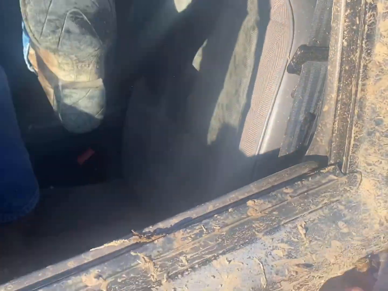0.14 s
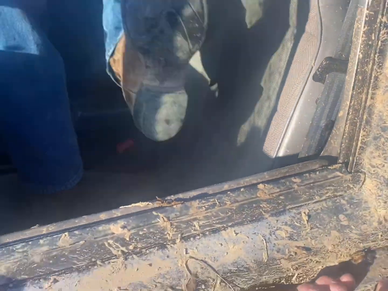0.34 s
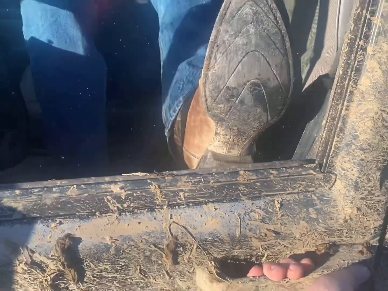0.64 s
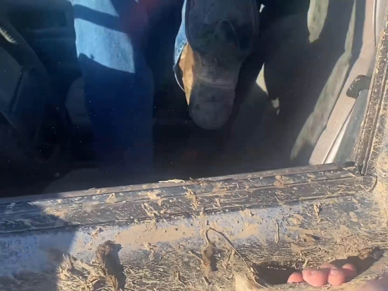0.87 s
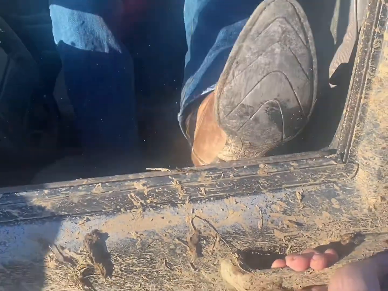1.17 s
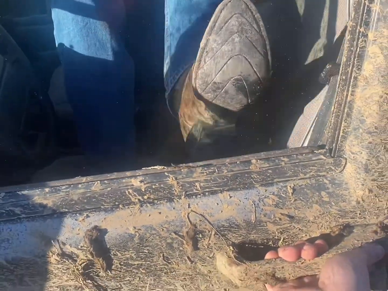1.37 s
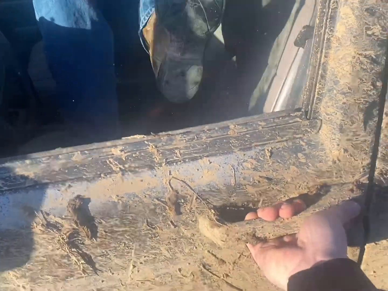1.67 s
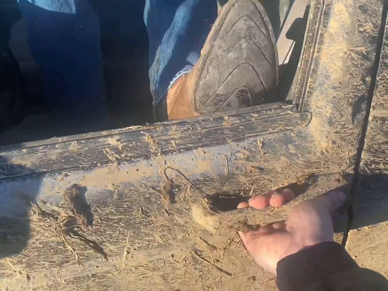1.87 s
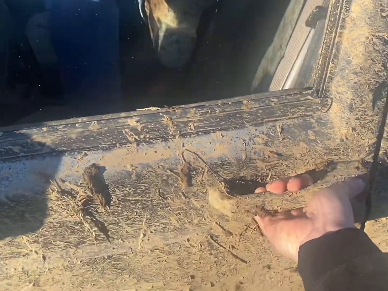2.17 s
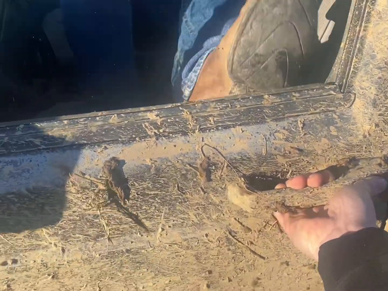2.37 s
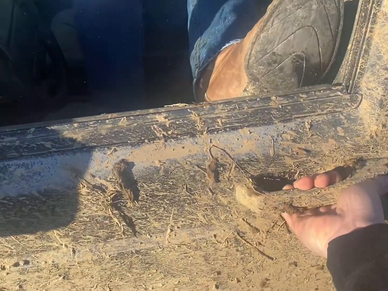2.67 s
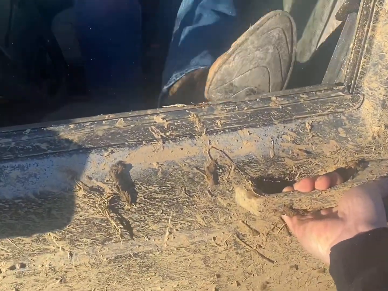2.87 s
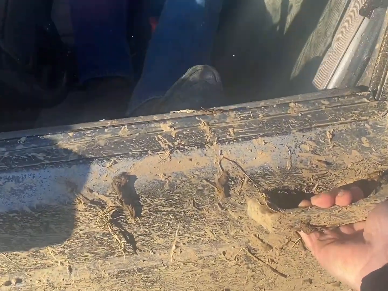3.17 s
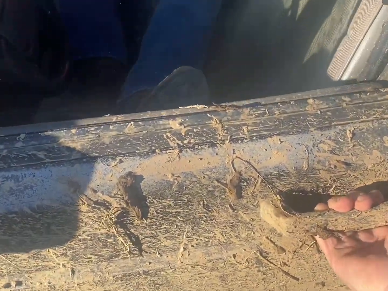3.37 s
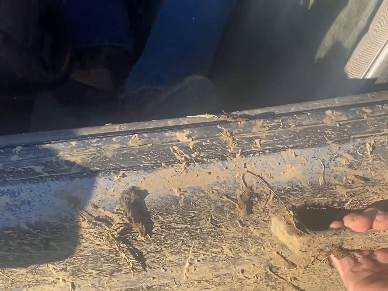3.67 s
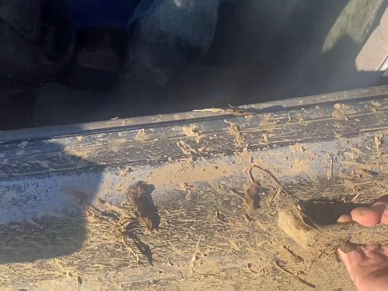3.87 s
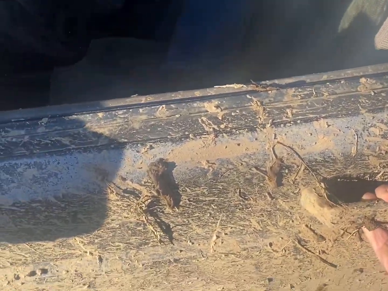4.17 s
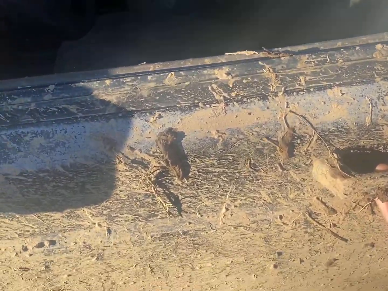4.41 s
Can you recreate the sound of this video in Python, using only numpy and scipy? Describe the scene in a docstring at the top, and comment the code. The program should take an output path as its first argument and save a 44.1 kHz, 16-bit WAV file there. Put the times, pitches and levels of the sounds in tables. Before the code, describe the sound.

Four booming boot kicks against a vehicle's door frame rattle loose trim while an engine hums softly, followed by light shuffling.

```python
"""At the door sill of an idling vehicle, a muddy boot kicks four times while the engine speed wanders.
Each impact cracks, disperses through the panel as a falling sweep and excites the modes of sill and
cab; the body booms, loose trim rattles and dried mud patters down. Cloth rustles by friction with
every swing, and the boot is set down with small knocks, scuffs and a dull thump.
A close microphone with a limiter compresses the kicks."""
import sys
import numpy as np
from scipy import signal
from scipy.io import wavfile
from scipy.ndimage import uniform_filter1d, minimum_filter1d

SR = 44100
rng = np.random.default_rng(int(sys.argv[2]) if len(sys.argv) > 2 else 0)


def output_pcm(signal):
    """Save a mono or channel-first signal as 16-bit PCM at the path in sys.argv[1].

    Samples are clipped to [-1, 1] before scaling.
    """
    pcm = np.clip(np.atleast_2d(signal).T, -1, 1) * 32767
    wavfile.write(sys.argv[1], SR, np.round(pcm).astype(np.int16))


N = 200346
T = np.arange(N) / SR

# Coherence of the two channels in broadband noise: f/Hz, correlation
COHERENCE = [(100, 0.9), (300, 0.81), (550, .6), (1000, 0.19), (2000, 0.58), (4500, 0.85), (8000, 1),
             (14000, 1)]
# Its balance: f/Hz, left minus right/dB
BALANCE = [(100, 0.5), (300, -2), (1000, 0.5), (2200, 3), (4000, 3), (8000, -0.5)]
# Course of the engine: t/s, fundamental f/Hz, second-order level/dB
ENGINE_COURSE = [(0, 64.7, -22.5), (0.091, 73.7, -40.5), (0.312, 80.56, -32), (.55, 85.55, -32.5),
                 (.98, 83.9, -34), (1.302, 77.43, -41.5), (2.249, 70.5, -50.5), (3.05, 61.38, -45),
                 (3.379, 55.73, -42), (3.851, 59.62, -36.5), (4.2, 62.9, -31), (4.54, 65.6, -34)]
# Upper engine orders: multiple, level at idle/dB
UPPER_ORDERS = [(3, -65), (4, -66.5), (5, -65.5), (6, -77)]
# Cloth rubbing as the leg shifts: t/s, level/dB, half-width/s
LEG_SHIFTS = [(0.02, -62, 0.094), (2.72, -65, .15), (2.956, -65, 0.089), (3.13, -74, 0.054),
              (3.358, -70, 0.023), (3.545, -57.5, .03), (3.708, -59, 0.12), (3.858, -58, 0.047),
              (4.2, -68, 0.12)]
# Cloth as the leg draws back, swings in and presses: t from kick/s, level/dB, half-width/s
LEG_SWING = [(-.22, -68, 0.27), (-.02, -53.5, 0.024), (0.208, -67, .11)]
# Kicks: t/s, force/dB, crack/dB, panel ring/dB, shudder/dB,
# struck spot f/Hz, spot/dB, sole slap/dB, rattle/dB, cloth/dB
BOOT_KICKS = [(0.3549, 1.5, -0.5, -1.5, -0.5, 545.4, -8, -23, 0, 5.5),
              (1.0245, -0.5, -4.5, 4, 0, 876, -12.5, -24, -3.5, -1),
              (1.682, -1, 8.5, 5.5, 5, 245, -5, -19, -3, -2),
              (2.294, -1, 0, 4.5, 0.5, 1252, -15.5, -30, -4, -8.5)]
# Modes of sill and cab: f/Hz, level/dB, T60/s
SILL_MODES = [(65, -10.5, 0.56), (74.6, -24.5, 0.17), (96.1, -3, 0.19), (110.8, -21.5, 0.75),
              (145.3, -16, 0.5), (170.8, -14, 0.56), (218.5, -23, 0.38), (269, -25, 0.17),
              (277, -24.5, 0.19), (292.3, -21.5, 0.43), (322.2, -11.5, 0.21), (335.7, -16, 0.35),
              (366.4, -22, 0.44), (376, -13.5, .27), (417, -15, 0.077), (522, -33.5, 0.15),
              (540, -24, 0.03), (615, -32.5, 0.48), (602, -33, 0.21), (683, -23.5, 0.28), (780, -26, 0.32),
              (825, -24.5, 0.37), (1134, -30.5, 0.058), (1334, -27.5, 0.28)]
# Push, rebound and rocking of the body: t after kick/s, f/Hz, level/dB, half-width/s
BODY_BOOMS = [(.0175, 100, -8.5, 0.014), (.059, 90, -11.5, 0.0057), (0.216, 54.3, -19, .036),
              (.315, 49, -25.5, .025), (0.417, 54, -25, .026)]
# Bounces of loose trim: t after kick/s, level/dB
TRIM_BOUNCES = [(.013, -12.5), (0.036, -13.5), (0.041, -12.5), (.055, -10), (.076, -12.5), (.101, -20),
                (.133, -37), (.188, -43.5), (0.305, -62)]
# Light knocks of the boot: t/s, level/dB, f/Hz, bandwidth/Hz
BOOT_KNOCKS = [(1.461, -33, 1300, 500), (1.469, -37.5, 481.6, 300), (2.675, -35, 695, 173),
               (2.678, -26.5, 190, 79.7), (2.742, -50, 1320, 1992), (2.804, -47, 1210, 1191),
               (3.492, -25.5, 171.5, 47.8), (3.556, -50.5, 1050, 400), (3.634, -45, 597, 495),
               (3.682, -39.5, 934, 802), (3.741, -44, 840, 1200), (4.102, -57, 700, 893)]
# Squeaks and swishes of the dragging sole: t/s, level/dB, f/Hz, bandwidth/Hz, half-width/s
SOLE_SCUFFS = [(2.948, -54.5, 3254, 351, .02), (2.952, -57.5, 1308, 900, 0.058),
               (3.118, -65, 12000, 6000, 0.028), (3.19, -49, 800, 450, .03),
               (3.265, -44.5, 1175, 172, .0075), (3.534, -63.5, 3940, 598, .023),
               (3.866, -55.5, 691, 693, 0.03), (4.061, -70.5, 3370, 502.4, 0.09)]
# Thump of the settling boot: t/s, level/dB
HEEL_THUMP = (3.6438, -12)
# Reflections from door and footwell: delay/s, level/dB
REFLECTIONS = [(.0019, -23.5), (.0043, -14)]
# Resonances of the left microphone port: f/Hz, bandwidth/Hz
PORT_MODES = [(8950, 1900), (13450, 310)]

# Noise spectra: f/Hz, relative density level/dB
RUMBLE_SPECTRUM = [(25, -15.5), (55, 5), (110, 3.5), (200, -4), (330, -15.5), (500, -23.5), (1000, -33),
                   (2000, -38), (4000, -46), (7000, -53), (11000, -61), (16000, -63.5)]  # engine and outdoor air
CLOTH_SPECTRUM = [(400, 7), (900, 7.5), (1500, 1), (2300, 1), (3800, -2.5), (7000, -10), (11000, -16),
                  (16000, -25)]  # cloth and leather
SNAP_SPECTRUM = [(1000, -6.5), (3000, -3.5), (5500, -5.5), (8000, 3.5), (11500, -5.5), (16000, -12.5)]  # hard contact
CRACK_SPECTRUM = [(300, -11.5), (700, -4), (1400, -14.5), (2000, -2.5), (4000, 6), (7500, -7.5),
                  (11000, -13), (16000, -85)]  # the struck sill
SHUDDER_SPECTRUM = [(25, -1.5), (50, -2.5), (200, -7.5), (360, 8.5), (450, -29.5), (560, 0.5), (780, -2),
                    (1050, -12.5), (1800, -13.5), (3800, -17.5), (7000, -30), (11000, -36.5),
                    (16000, -38.5)]  # the shaken body
CAB_SPECTRUM = [(25, 8.5), (55, 4), (150, 5), (350, -7), (500, -11.5), (800, -16.5), (1500, -27.5),
                (4000, -46.5), (7500, -55.5), (16000, -66.5)]  # reverberation of the cab
TRIM_SPECTRUM = [(200, 27), (700, 12), (1500, -22), (3700, 8.5), (5500, -21), (8000, -1.5), (12000, -22),
                 (16000, -35.5)]  # clacking trim
MUD_SPECTRUM = [(500, 7), (1500, 4.5), (4000, 1), (7000, -7), (11000, -20), (16000, -23)]  # falling crumbs


def from_db(db):
    """Amplitude ratio of a level in decibels."""
    return 10 ** (np.asarray(db) / 20)


def rms_one(x):
    """Normalisation to unit mean power."""
    return x / np.sqrt(np.mean(x ** 2) + 1e-20)


def at_hz(points, hz):
    """Interpolation on a logarithmic frequency axis."""
    frequencies, values = np.transpose(points)
    return np.interp(np.log(hz), np.log(frequencies), values)


def age(s):
    """Time elapsed since s, zero before."""
    return np.maximum(T - s, 0)


def decay(s, t60):
    """Damping: a step to one at s, then a fall of 60 dB every t60 seconds."""
    return (T >= s) * np.exp(-np.minimum(np.log(1000) * age(s) / t60, 40))


def swell(s, half_width):
    """A Gaussian envelope, down to 1/e at half_width seconds from s."""
    return np.exp(-np.minimum(((T - s) / half_width) ** 2, 40))


def drift(rate_hz):
    """Random modulation of unit rms, interpolated between independent values."""
    knots = rng.standard_normal(4096)
    return rms_one(np.interp(T * rate_hz, np.arange(len(knots)), knots))


def grains(per_s, spread_db, decay_s):
    """Shot noise: an envelope of randomly timed ticks, most small and a few large."""
    arrivals = rng.random(N) < per_s / SR
    sizes = from_db(spread_db * np.minimum(rng.exponential(1, N), 3))
    return signal.lfilter([1], [1, -np.exp(-1 / (decay_s * SR))], arrivals * sizes + 1e-18)


def resonance(x, hz, width):
    """A two-pole resonator of unit peak gain and a bandwidth of width Hz."""
    radius = np.exp(-np.pi * width / SR)
    feedback = [1, -2 * radius * np.cos(2 * np.pi * hz / SR), radius ** 2]
    return signal.lfilter(np.array([1, 0, -1]) * (1 - radius ** 2) / 2, feedback, x)


def coloured_noise(spectrum):
    """Partially coherent stereo noise of unit rms, summed from half-octave bands."""
    out, edges = 0, 24 * 2 ** np.arange(0, 9.6, .5)
    white, sides = rng.standard_normal((2, 2, N)), np.array([[1], [-1]])
    for k, (low, high) in enumerate(zip(edges, edges[1:])):
        band = signal.butter(2, [low, high], "band", fs=SR, output="sos")
        mid, side = signal.sosfilt(band, white[k % 2])
        hz = np.sqrt(low * high)
        alike = np.clip(at_hz(COHERENCE, hz), -1, 1)
        gain = from_db(at_hz(spectrum, hz) + sides * at_hz(BALANCE, hz) / 2)
        out = out + gain * (np.sqrt(1 + alike) * mid + np.sqrt(1 - alike) * side * sides)
    return rms_one(out)


def narrow_noise(hz, width, spread=0.48, wide_hz=700):
    """Resonant stereo noise of unit rms, more coherent in the bass."""
    mid, side = resonance(resonance(rng.standard_normal((2, N)), hz, width), hz, width)
    return rms_one(mid + spread * min(hz / wide_hz, 1) * side * np.array([[1], [-1]]))


def engine(idle_hz=60, waver_db=3.5, rough_db=4.0):
    """Periodic excitation: a second-order hum; the other orders and the rumble grow with speed."""
    times, *columns = np.transpose(ENGINE_COURSE)
    hz, hum_db = [np.interp(T, times, column) for column in columns]
    phase = 2 * np.pi * np.cumsum(hz) / SR
    above_idle = hz - idle_hz
    first_order_db = -51 + 0.672 * above_idle + waver_db * drift(rate_hz=20)
    hum = from_db(first_order_db) * np.sin(phase) + from_db(hum_db) * np.sin(2 * phase)
    for order, db in UPPER_ORDERS:
        order_db = db + 0.35 * above_idle + rough_db * drift(rate_hz=9.9)
        hum += from_db(order_db) * np.sin(order * phase)
    rumble = from_db(-43.5 + 0.36 * above_idle) * coloured_noise(RUMBLE_SPECTRUM)
    return np.sqrt(2) * hum + rumble


def cloth_rustle(rest_db=-70, grain_db=2.0, patchy_db=4.0):
    """Stick-slip friction: cloth and leather catch in patches, and the mud on them crackles."""
    motion = from_db(rest_db) + sum(from_db(db) * swell(s, half) for s, db, half in LEG_SHIFTS)
    for s, *_, cloth_db in BOOT_KICKS:
        motion += sum(from_db(cloth_db + db) * swell(s + after, half) for after, db, half in LEG_SWING)
    slipping = from_db(grain_db * drift(rate_hz=200) + patchy_db * drift(rate_hz=50))
    crackle = from_db(-3) * grains(per_s=40, spread_db=3.5, decay_s=0.001)
    return motion * (slipping + crackle) * coloured_noise(CLOTH_SPECTRUM)


def bending_wave(s, drop_hz, end_hz, fall_s, t60):
    """Dispersion: short bending waves travel fastest, so a blow arrives as a falling sweep."""
    t = age(s)
    cycles = end_hz * t + drop_hz * fall_s * np.log1p(t / fall_s)
    return np.sin(2 * np.pi * cycles) * decay(s, t60)


def sill_ring(s, ring_db, vary_db=2.0, panel_hz=200, scatter_hz=1100):
    """Modal superposition: each damped mode builds up over a cycle or two, so the lows come last."""
    t, out = T[:SR], np.zeros((2, N))
    start = round(s * SR)
    chances = rng.standard_normal((len(SILL_MODES), 3))
    for (hz, db, t60), (strength, timing, skew) in zip(SILL_MODES, chances):
        if hz > panel_hz:  # panel modes vary from kick to kick, the deep cab modes do not
            db += ring_db + vary_db * strength
        envelope = from_db(db - 60 * t / t60) * (1 - np.exp(-(t * hz) ** 2))
        # the phase of short waves depends on where the boot lands
        scatter = (hz / scatter_hz) ** 2 * (timing + skew * np.array([[.2], [-.2]]))
        out[:, start:start + SR] -= envelope * np.sin(2 * np.pi * (hz * t + scatter))
    return out


def body_booms(s):
    """Recoil: the body yields, rebounds and rocks, radiating low-frequency pulses."""
    return sum(from_db(db) * swell(s + after, half) * np.cos(2 * np.pi * hz * (T - s - after))
               for after, hz, db, half in BODY_BOOMS)


def kicks():
    """Impulsive excitation: brief contact gives broadband noise and sets panel and cab vibrating."""
    vibration = slap = snap = crack = shudder = tail = 0
    for s, force_db, crack_db, ring_db, shudder_db, spot_hz, spot_db, slap_db, *_ in BOOT_KICKS:
        force = from_db(force_db)
        wave = bending_wave(s, drop_hz=2450, end_hz=80, fall_s=.0007, t60=.2)
        sweep = from_db(-2) * wave * swell(s + .005, half_width=.006)
        spot_envelope = from_db(spot_db) * decay(s, t60=.1) * (1 - decay(s, t60=0.0091))
        spot = spot_envelope * narrow_noise(spot_hz, width=140)
        vibration += force * (sweep + spot + sill_ring(s, ring_db) + body_booms(s))
        # envelopes of the noise layers
        slap += from_db(slap_db) * swell(s + 0.0023, half_width=0.0063)
        snap += force * decay(s + 0.000087, t60=0.0063)
        crack += force * from_db(crack_db) * decay(s, t60=0.021) * (1 - decay(s, t60=0.0013))
        shudder += force * from_db(shudder_db) * decay(s, t60=0.25) * (1 - decay(s, t60=0.02))
        tail += force * decay(s, t60=0.76)
    chatter = from_db(2.8 * drift(rate_hz=250))  # parts strike against each other
    return (vibration
            + slap * narrow_noise(hz=900, width=2400)
            + from_db(-6) * snap * coloured_noise(SNAP_SPECTRUM)
            + from_db(-8) * crack * coloured_noise(CRACK_SPECTRUM)
            + from_db(-10) * shudder * chatter * coloured_noise(SHUDDER_SPECTRUM)
            + from_db(-17.5) * tail * coloured_noise(CAB_SPECTRUM))


def trim_rattle(vary_db=1.5, tick_db=-15):
    """Repeated collision: loose trim bounces after each kick, with a clack and a bright tick."""
    clacks = ticks = 0
    for s, *_, rattle_db, _ in BOOT_KICKS:
        for after, db in TRIM_BOUNCES:
            strength = from_db(rattle_db + db + vary_db * rng.standard_normal())
            clacks += strength * decay(s + after, t60=0.028)
            ticks += strength * decay(s + after, t60=0.0067)
    return (clacks * coloured_noise(TRIM_SPECTRUM)
            + from_db(tick_db) * ticks * coloured_noise(SNAP_SPECTRUM))


def mud_patter(peak_per_s=48):
    """A Poisson process: crumbs shaken loose by each kick land independently in a brief shower."""
    rate = peak_per_s * sum(swell(s + .19, half_width=.11) for s, *_ in BOOT_KICKS)
    return from_db(-48) * grains(rate, spread_db=3.0, decay_s=.0022) * coloured_noise(MUD_SPECTRUM)


def boot_shuffle(t60_at_1khz=0.058):
    """Impact and friction: the boot knocks, its sole drags, and it settles with a falling thump."""
    out = 0
    for s, db, hz, width in BOOT_KNOCKS:
        t60 = t60_at_1khz * (hz / 1000) ** -0.398  # lower knocks last longer
        out += from_db(db) * decay(s, t60) * (1 - decay(s, t60=2 / width)) * narrow_noise(hz, width)
    for s, db, hz, width, half in SOLE_SCUFFS:
        out += from_db(db) * swell(s, half) * narrow_noise(hz, width)
    s, db = HEEL_THUMP
    thump = bending_wave(s, drop_hz=495, end_hz=29.4, fall_s=0.0045, t60=0.13)
    return out + from_db(db) * thump * swell(s + 0.0057, half_width=0.0034)


def near_echoes(x):
    """Comb filtering: early reflections interfere with the direct sound and make it hollow."""
    echoes = sum(from_db(db) * np.roll(x, round(delay * SR), axis=-1) * (T >= delay)
                 for delay, db in REFLECTIONS)
    power_gain = 1 + sum(from_db(db) ** 2 for _, db in REFLECTIONS)
    return (x + echoes) / np.sqrt(power_gain)


def microphone_port(x):
    """All-pass filtering: the left port's resonances turn the phase of the treble."""
    left, right = x
    for hz, width in PORT_MODES:
        left = left - 2 * resonance(left, hz, width)
    return np.array([left, right])


def scene():
    """Superposition at close range; cloth, trim and mud also reflect from door and footwell."""
    return engine() + kicks() + near_echoes(cloth_rustle() + trim_rattle() + mud_patter()) + boot_shuffle()


def record(dry, ceiling_db=-0.5, release_db_per_s=900, attack_s=.0005, cutoff_hz=15900):
    """Look-ahead limiting: gain falls before a peak and recovers in milliseconds; a low-pass follows."""
    heard = microphone_port(dry)
    excess_db = np.maximum(20 * np.log10(np.abs(heard).max(axis=0) + 1e-9) - ceiling_db, 0)
    release_db = release_db_per_s * T
    reduction_db = np.maximum.accumulate(excess_db + release_db) - release_db
    span = round(attack_s * SR)
    gain_db = uniform_filter1d(minimum_filter1d(-reduction_db, 2 * span + 1), span)
    low_pass = signal.ellip(10, .2, 80, cutoff_hz, fs=SR, output="sos")
    return signal.sosfilt(low_pass, heard * from_db(gain_db))


dry = scene()
out = record(dry)
output_pcm(out)
```